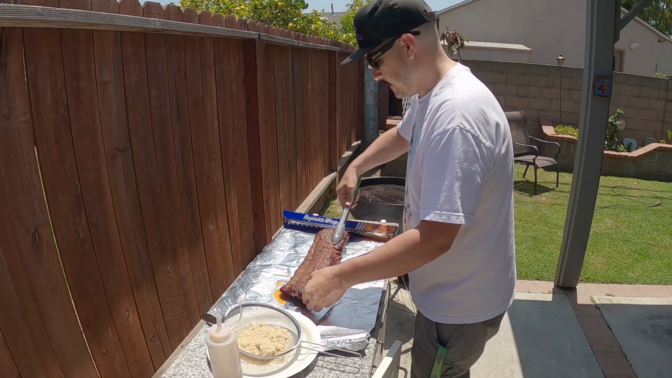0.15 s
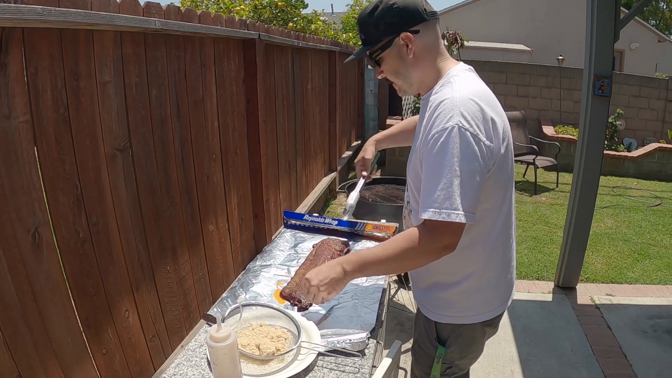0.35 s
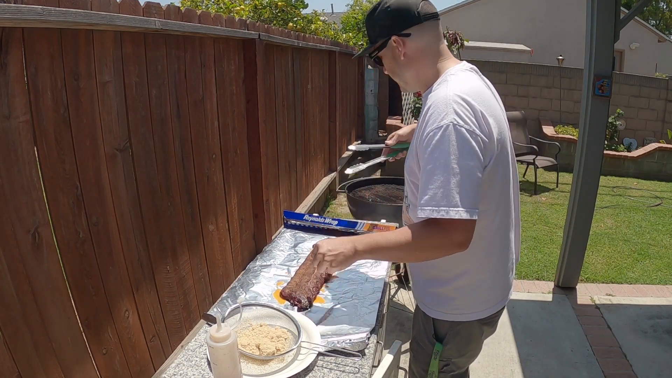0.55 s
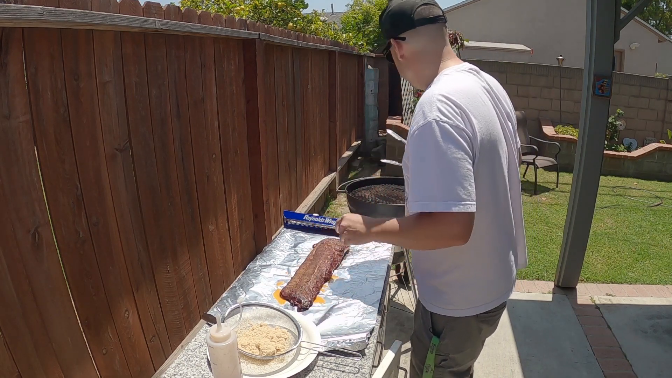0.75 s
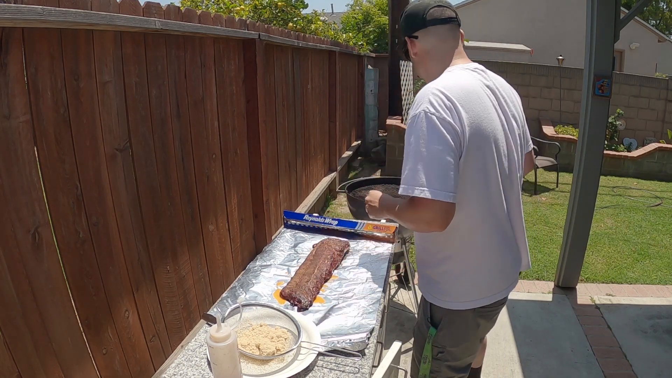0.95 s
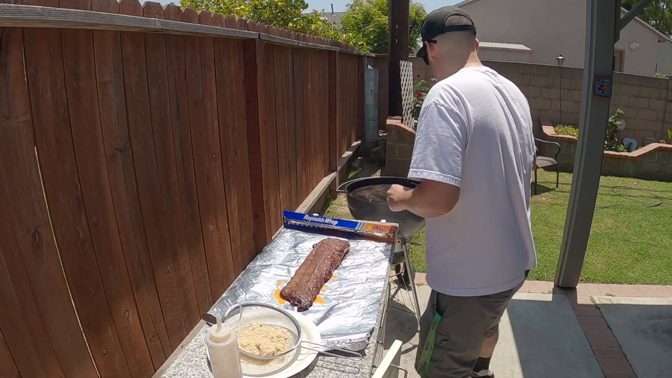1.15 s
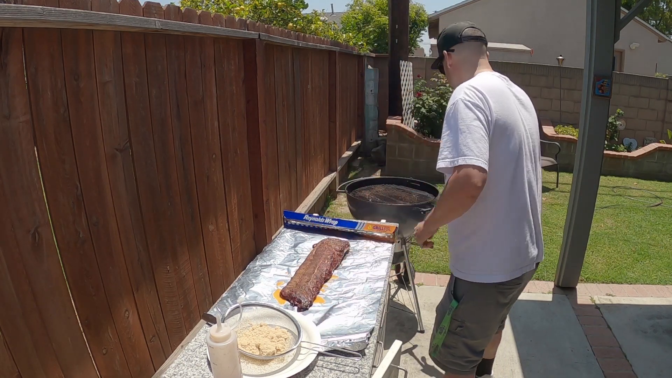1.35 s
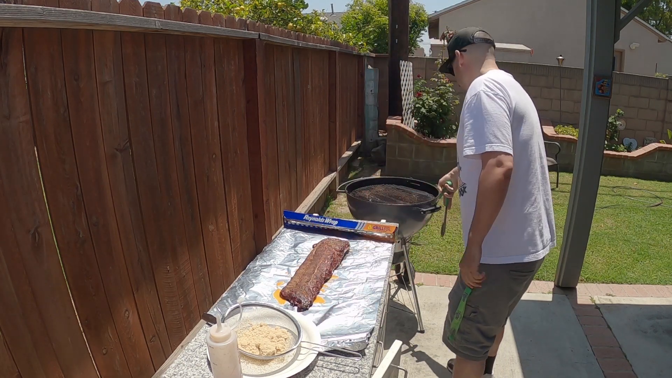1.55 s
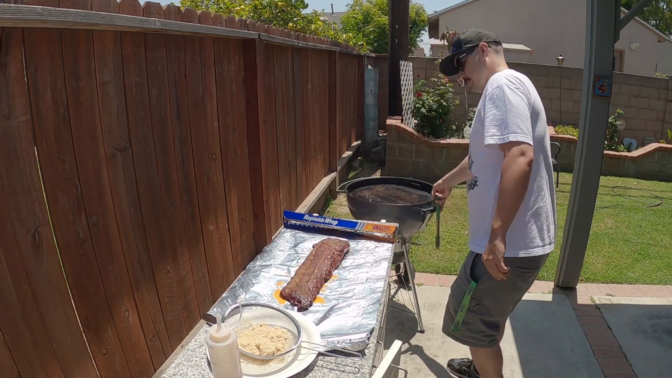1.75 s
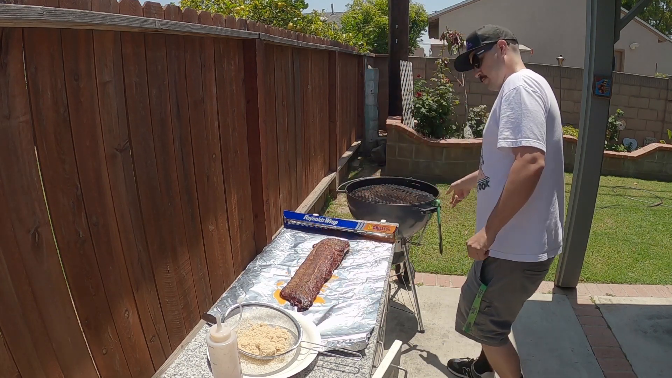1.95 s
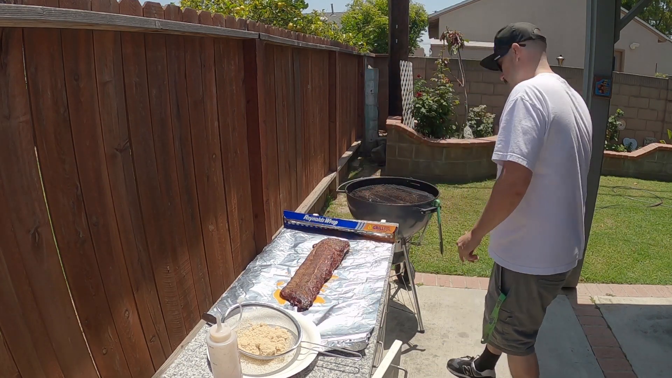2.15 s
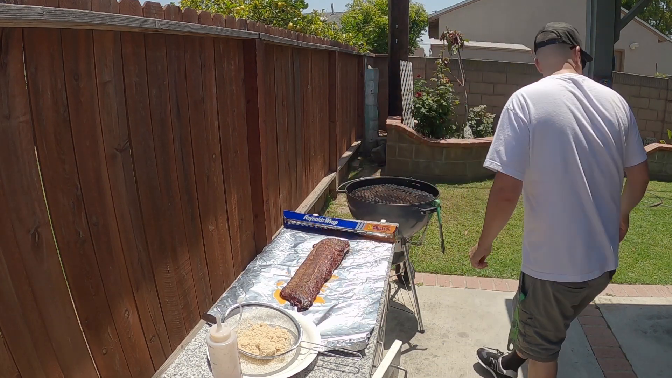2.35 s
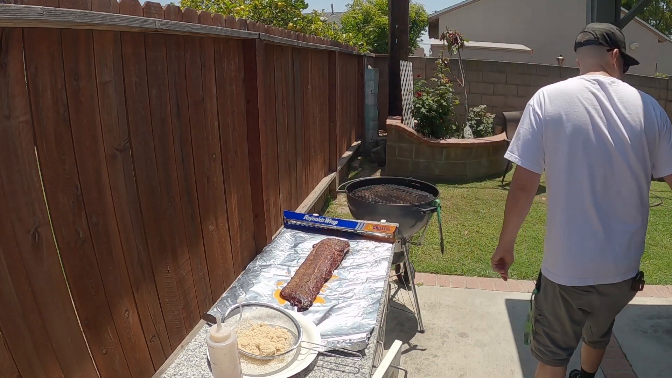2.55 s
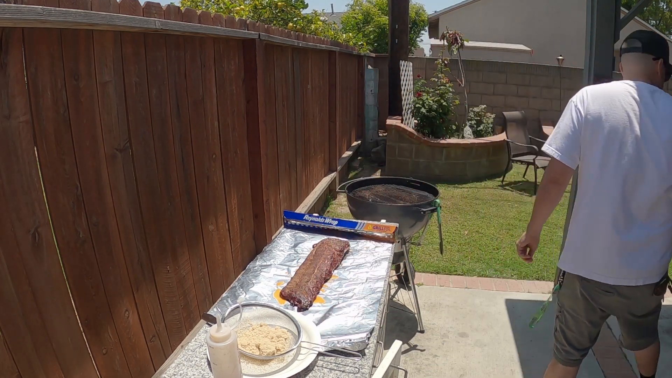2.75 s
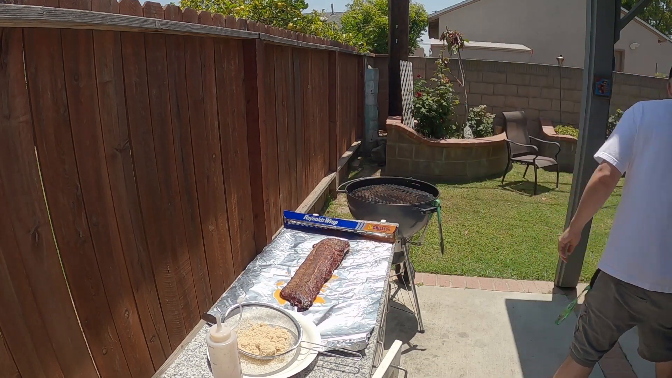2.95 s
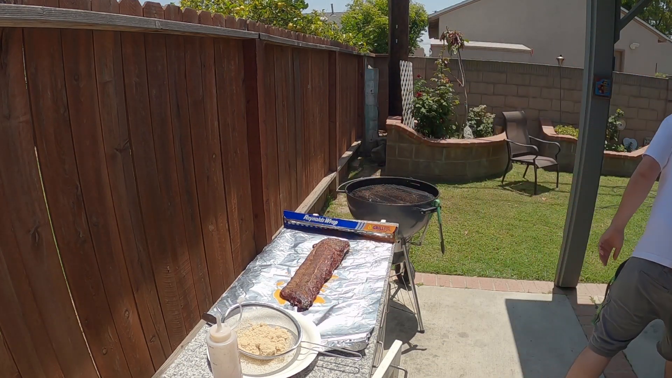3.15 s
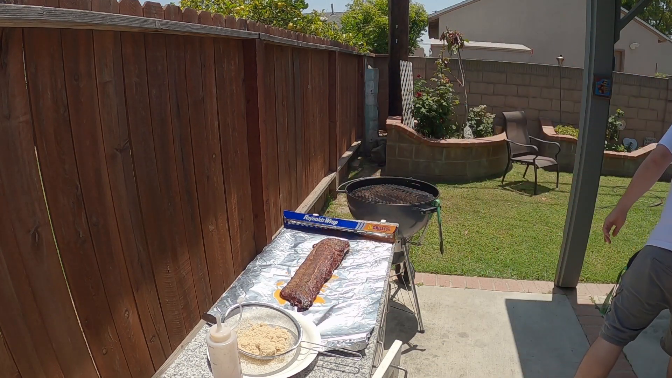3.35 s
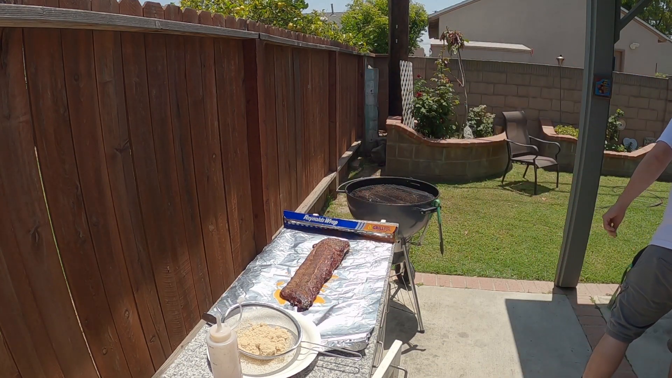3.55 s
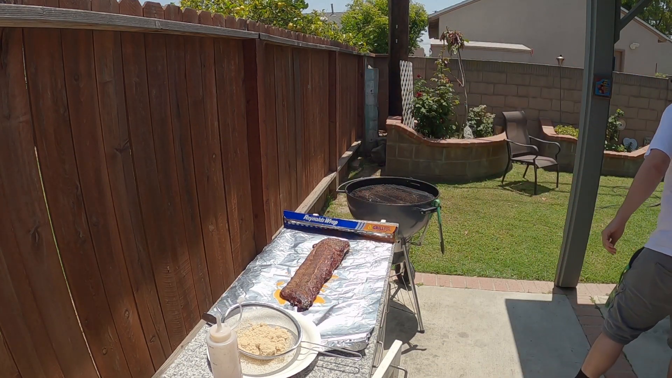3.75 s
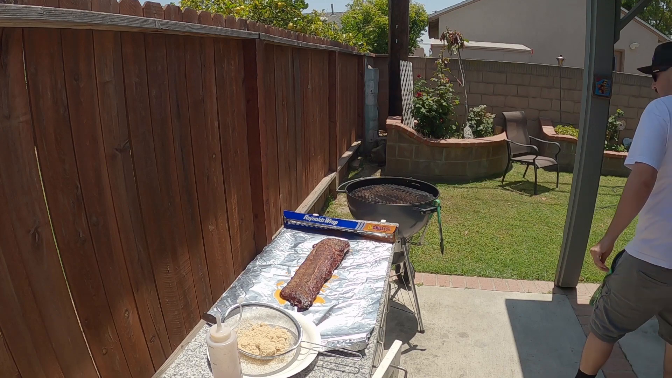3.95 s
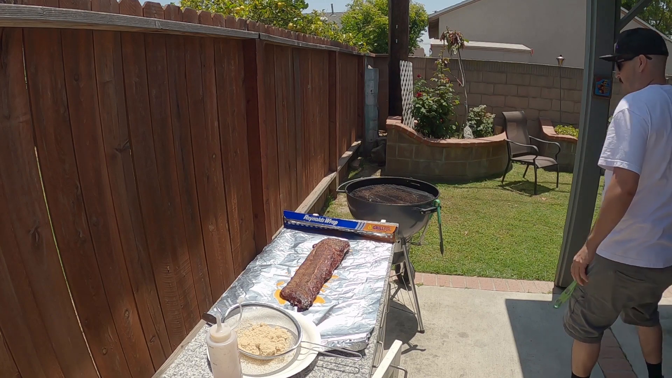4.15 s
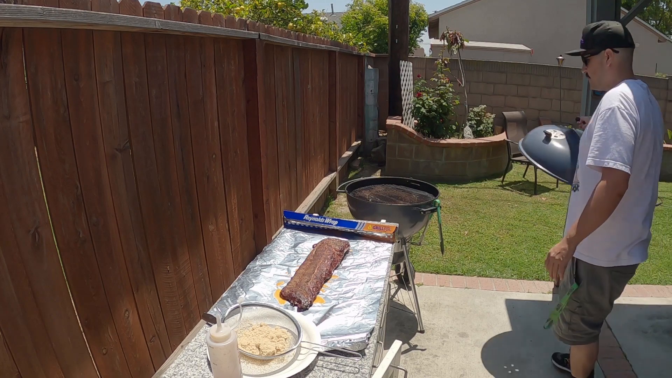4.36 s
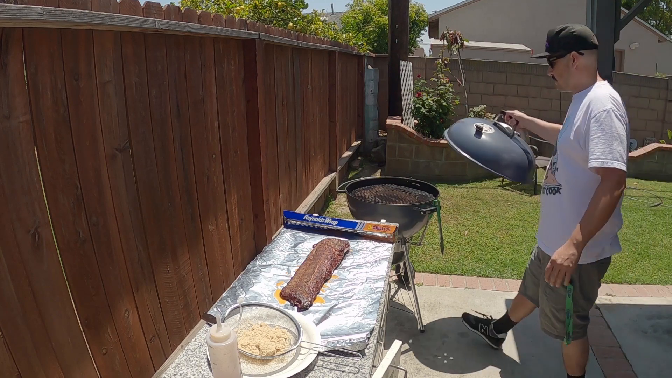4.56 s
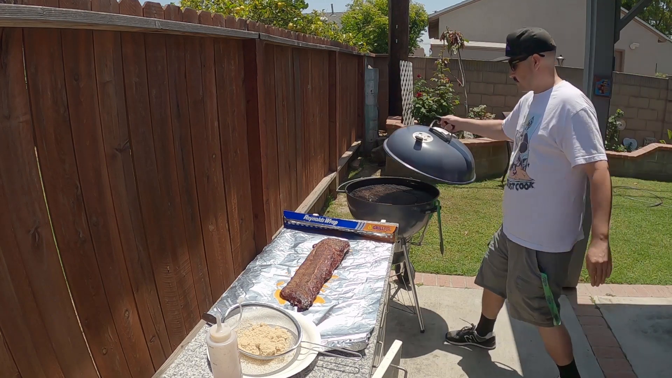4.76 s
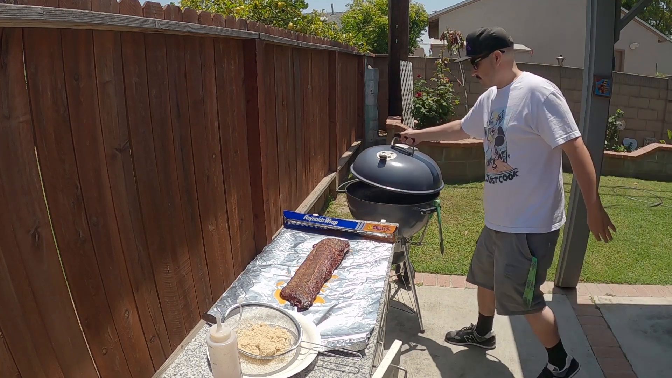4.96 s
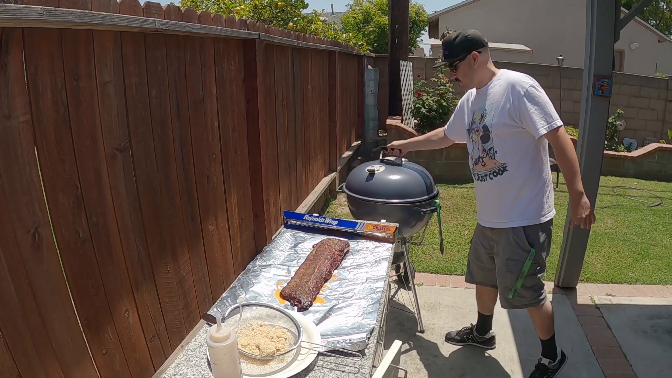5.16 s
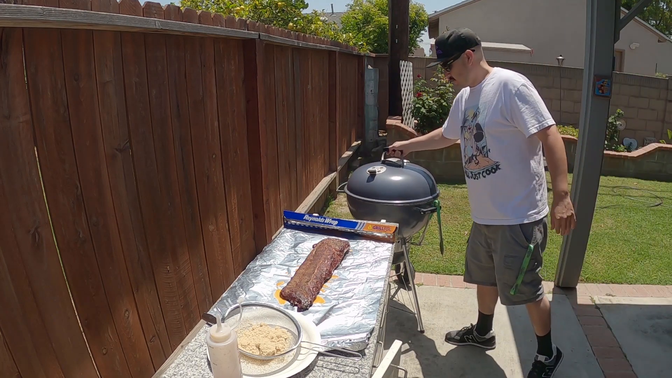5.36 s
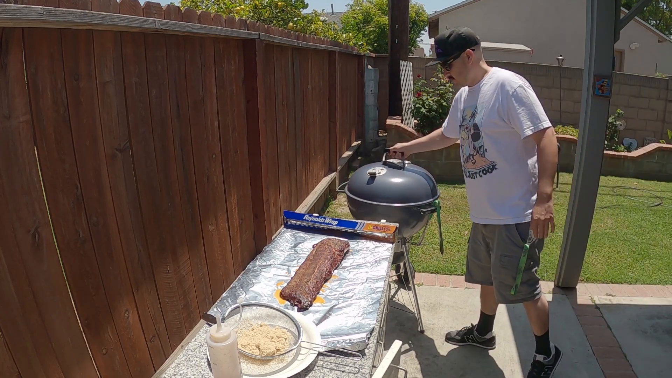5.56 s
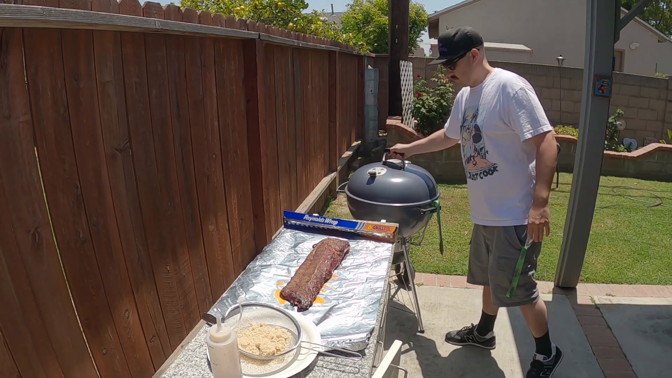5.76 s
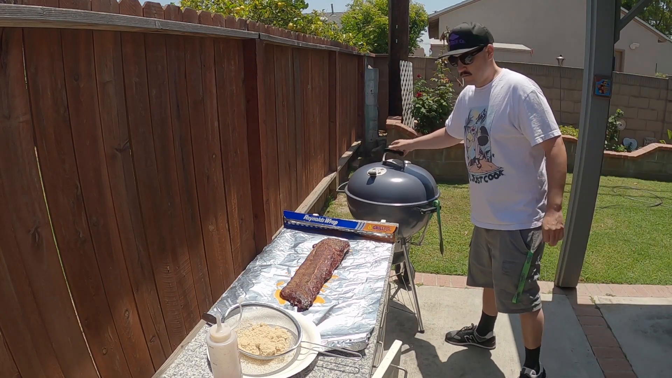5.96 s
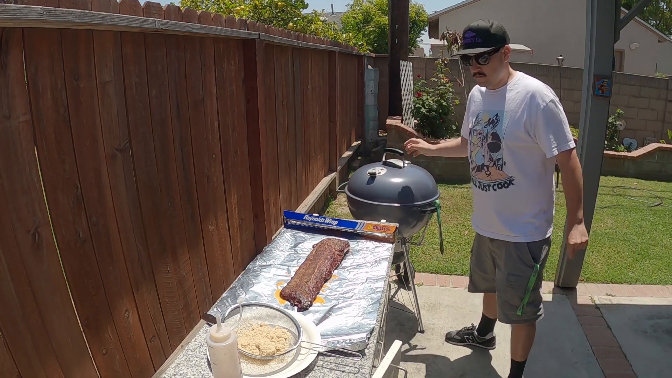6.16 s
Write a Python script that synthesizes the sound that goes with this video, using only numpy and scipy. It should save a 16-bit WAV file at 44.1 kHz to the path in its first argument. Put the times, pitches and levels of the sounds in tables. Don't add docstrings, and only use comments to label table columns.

```python
import sys
import numpy as np
from scipy import signal
from scipy.fft import rfft, irfft
from scipy.io import wavfile
from scipy.ndimage import uniform_filter1d

SR = 44100
rng = np.random.default_rng(int(sys.argv[2]) if len(sys.argv) > 2 else 0)


def invert_db(x):
    u = np.asarray(x, float) / 20
    return 10 ** u


def dump(signal):
    limited = np.clip(np.atleast_2d(signal).T, -1, 1)
    pcm = np.round(limited * 32767).astype(np.int16)
    wavfile.write(sys.argv[1], SR, pcm)


N = 273930

# frequency in Hz, density in dB per Hz.
YARD_COLOUR = [(12, -36.5), (20, -5.5), (44, -1.5), (129, -10), (157, -13), (196, -15.5), (252, -14.5),
               (315, -22), (597, -26), (667, -30.5), (1160, -28), (3350, -40), (7800, -54.5), (8400, -63),
               (12800, -76.5), (15500, -94)]
# frequency in Hz, width in Hz, level in dB.
DRONES = [(43, 1.3, -38), (87.5, 8.7, -44), (253.5, 4.314, -50.5), (608, 11.95, -57)]
# frequency in Hz, likeness from 0 to 1.
YARD_LIKENESS = [(60, 0.9954), (180, 0.9896), (550, 0.921), (1650, 0.67), (4970, 0.268), (15000, 0.36)]
# frequency in Hz, left over right in dB.
YARD_LEAN = [(60, 1.36), (240, 0.5), (950, -0.75), (3770, 2.5), (15000, -3)]

# frequency in Hz, density in dB per Hz.
FOIL_COLOUR = [(290, -42.5), (500, -16), (1140, -0.5), (1630, -14), (1830, -3), (2450, 0.5), (3830, 3.5),
               (6530, -6), (7760, -8.5), (11000, -22), (15700, -37)]
# time of the peak in seconds, peak in dB, brightness in dB, seconds to fall
# 20 dB.
PRESSES = [
    (0.0, -38, -16, 0.15),
    (0.198, -42.5, -9, 0.12),
    (0.278, -45, -11, 0.1),
    (0.324, -38, -7, 0.08),
    (0.42, -32.5, -13.5, 0.12),
    (0.486, -25.5, -8, 0.1154),
    (0.53, -20, -2, 0.0948),
]
# start in seconds, peak in dB, low share in dB (wide folds snap lower).
SNAPS = [(0.014, -26, -2), (0.061, -32, -16), (0.088, -30, -11), (0.138, -30, -9), (0.166, -28.5, -12),
         (0.187, -20.5, -11.5), (0.2147, -24, -13), (0.2776, -26, -31), (0.3087, -24.5, -3),
         (0.324, -24.5, -10), (0.3817, -34, 6), (0.394, -27.5, -20), (0.4242, -26, -9), (0.4387, -19.5, 11),
         (0.4566, -28, 4), (0.4714, -18.5, -1.5), (0.4819, -12, -15), (0.4956, -10.5, -7),
         (0.5048, -3.5, -9.5), (0.525, -13, -22), (0.5306, -7.5, -20), (0.545, -13, -17),
         (0.5513, -15.5, -18), (0.598, -26, -16.5), (0.633, -28, -12.5)]

# time of the peak in seconds, peak in dB, seconds to fall 20 dB.
SCUFFS = [
    (1.524, -47.5, 0.12),
    (3.3, -56.5, 1),
    (4.138, -53.5, 0.66),
    (4.945, -52.5, 0.6),
    (5.018, -49, 0.04),
    (5.64, -48.5, 0.4),
    (5.75, -37.5, 0.06),
]
# frequency in Hz, density in dB per Hz.
SCUFF_COLOUR = [(710, -56), (1200, -6), (1570, -5), (2590, -3.5), (3250, -2.5), (4570, -15.5), (5670, -14),
                (14000, -44.5)]
# start in seconds, peak in dB, frequency in Hz.
TICKS = [
    (3.0878, -30, 1700),
    (4.2695, -52, 7600),
]

# start in seconds, then crack peak, grate, arms and hinge levels in dB.
KNOCKS = [(1.5272, -34, -62, -49, -78), (1.6835, -13, -24, -50, -54), (1.7075, -23, -36, -53.5, -60.5),
          (1.7288, -36, -34.5, -53.5, -62.5), (1.7512, -25, -44, -59.5, -45),
          (1.7913, -16.5, -42, -36, -56), (1.797, -29, -47.5, -35, -58), (1.9265, -14.5, -46, -13.5, -48),
          (1.968, -36, -60, -28, -49), (1.9874, -11, -35, -23.5, -54), (2.008, -35, -55, -30, -51)]
# frequency in Hz, level in dB, seconds to fall 60 dB.
GRATE = [(1185, 7, 0.06), (1304, 6, 0.032), (1430, -11, 0.27), (1880, -5.5, 0.23), (3580, -8, 0.07),
         (4070, -9, 0.13), (5450, -12, .13), (7650, -16, 0.09), (10600, -19, .04)]
# frequency in Hz, level in dB, t60 in seconds.
GRIPPED_ARMS = [(2500, -6, 0.043), (2683, 0, 0.15), (2880, -6, 0.1), (3150, -4, 0.1)]
# frequency in Hz, level in dB, t60 in seconds.
FREE_ARMS = [(2670, -18, 0.146), (2860, -20, 0.088), (2975, -9, 0.11), (3040, -3, 0.15), (3093, -3, 0.12),
             (3190, 0, 0.09), (3280, -11, 0.07), (3460, -25, 0.06)]
# frequency in Hz, level in dB, t60 in seconds.
HINGE = [(3780, -2, 0.09), (4670, 2, 0.29), (5040, -14, .09)]
# frequency in Hz, level in dB, t60 in seconds.
TIPS = [(6860, -8, 0.17), (7750, -14, .04), (9600, -18, 0.04), (10900, -27, .12)]
# time of the peak in seconds, peak in dB, seconds to fall 20 dB.
SCRAPES = [
    (1.705, -41, 0.21),
    (1.8, -47, 0.2),
    (1.94, -39, 0.154),
    (1.995, -46.5, 0.23),
]
# frequency in Hz, density in dB per Hz.
SCRAPE_COLOUR = [(900, -30), (2200, -3), (3700, 1), (4600, -11), (5500, -7), (6500, -15.5), (10000, -23.5),
                 (15000, -40)]
# start in seconds, peak in dB.
JOLTS = [(1.684, -30.5), (1.734, -31), (1.795, -25), (1.814, -29.5), (1.977, -23.5), (2.011, -29.5),
         (2.03, -25.5), (2.041, -24), (2.05, -27.5), (2.064, -27), (2.089, -26.5), (2.109, -33)]
# frequency in Hz, level in dB, t60 in seconds.
KETTLE = [(426, -4.5, 0.093), (506, -9, 0.127), (545, -1, 0.13), (595, -0.5, 0.083), (664, -0.5, 0.1),
          (715, 1.5, 0.103), (781, 3.5, 0.118), (936, -1.5, 0.08)]
# frequency in Hz, level in dB, t60 in seconds.
LEGS = [(148, -10, 0.137), (189.5, -2, 0.21), (244, 0.5, 0.13), (335.7, -13, 0.088)]
LET_GO = 1.9

# start in seconds, then blow peak, shell, steel and thud levels in dB.
TOUCH = [
    (5.3019, -12, -28, -29, -20),
    (5.3035, -1, -19, -14.5, 1),
    (5.3143, -9.5, -17.5, -18.5, -13),
    (5.3335, -8.5, -24, -18.5, -18),
]
# start in seconds, then blow peak, shell, steel and thud levels in dB.
DROP = [
    (5.3605, -2, -14.5, -21, 1.5),
    (5.375, -9, -13.5, -16.5, -10),
    (5.3939, -12, -14, -22.5, -14),
    (5.4127, -12, -19, -18, -13),
]
# start in seconds, then blow peak, shell, steel and thud levels in dB.
SETTLE = [
    (5.4467, -5.5, -22.5, -20.5, -14),
    (5.4581, -7, -18, -22.5, -11.5),
    (5.4667, -6, -16, -20.5, -10.5),
    (5.4897, -14, -20, -23, -28),
]
# start in seconds, then blow peak, shell, steel and thud levels in dB.
REST = [
    (5.5226, -24, -26, -30.5, -36),
    (5.551, -31.5, -32.5, -36, -40),
    (5.574, -38, -32, -41, -46),
    (5.615, -40, -38, -49, -50),
]
# start in seconds, then blow peak, shell, steel and thud levels in dB.
NUDGE = [
    (5.6546, -40, -30.5, -47, -48),
    (5.7222, -27.5, -34, -44, -33),
    (5.7515, -32, -32, -46, -32),
]
# frequency in Hz, level in dB.
SHELL_STAGES = [
    [(141, -2.5), (365, -4), (474, 0)],
    [(85, -14), (141, -10), (280, -10.5), (366, -10), (463, -15), (620, -16.5), (790, -18)],
    [(85, -14.5), (140, -2), (264, -6.5), (330, 1), (463, -4.5), (592, -13), (810, -18)],
    [(140, -5), (330, -3.5), (450, -5.5)],
    [(178, -4), (340, 2.5), (400, -3), (460, -3)],
]
# frequency in Hz, level in dB.
LID_STEEL = [(931.3, -37.5), (1820, -27.5), (2196, -33), (2444, -21), (2665, -34.5), (2998, -27.5),
             (3149, -25), (3402, -32), (3623, -34.5), (3860, -31), (4097, -31.5), (4990, -31), (5426, -30),
             (5658, -35), (6094, -38), (6385, -44), (6831, -42)]
# frequency in Hz, level in dB.
BOWL_STEEL = [(753.7, -39), (958.2, -41), (1244, -45), (1464, -32.5), (1814, -33), (1938, -23),
              (2196, -32.5), (2460, -28.5), (2708, -30), (2939, -27), (3050, -30), (3171, -29.5),
              (3397, -36.5), (3634, -43), (3854, -32), (5216, -43.5), (6078, -53)]
# frequency in Hz, level in dB.
BAR_STEEL = [(812.9, -44), (947, -45.5), (1098, -47), (1251, -35), (1338, -36), (1610, -34.5), (1663, -37),
             (1949, -36), (2132, -48), (2207, -48.5), (2455, -43.5), (2719, -48), (2955, -30.5),
             (3052, -42), (3176, -35), (3408, -39), (3634, -39), (3957, -47), (5496, -42), (5722, -51)]
# frequency in Hz, level in dB.
SEATED_STEEL = [(1098, -11), (1254, 0), (1335, -1), (1642, -1), (1852, -5), (1935, -11), (2170, -10),
                (2440, -7), (2708, -15), (2955, -3), (3165, -5), (3650, -11), (3844, -18)]
# frequency in Hz, seconds to fall 60 dB.
STEEL_T60 = [(100, 0.53), (200, 0.17), (400, 0.064), (1000, 0.34), (1700, 0.31), (3000, 0.18), (4000, 0.21),
             (5500, 0.075), (7000, 0.127)]
# frequency in Hz, level in dB, t60 in seconds.
THUD = [(132.5, -12, 0.029), (199, 1, 0.055), (287.4, 5, 0.034), (336, 4.5, 0.0325), (473.7, 2, 0.039),
        (550, -4.5, 0.033), (660, -10.5, 0.038), (955, -20, 0.059)]
# frequency in Hz, level in dB.
RATTLE = [(700, -13), (1500, -12.5), (2800, 3.5), (4500, -5), (5500, -7.5), (8000, -17.5), (12000, -27.5)]
# start in seconds, peak in dB, frequency in Hz, rise and hold in seconds.
BOOMS = [(5.3025, -9, 200, 0.003, 0.01), (5.311, -13, 480.2, 0.0037, 0.012),
         (5.331, -1, 181.4, 0.0077, .03), (5.3594, -6, 200, .002, 0.0067), (5.3706, -9, 272, .003, 0.011),
         (5.3722, -8, 152, .004, .012), (5.3934, -8, 175, .004, 0.014), (5.41, -2, 185.5, 0.0058, .013),
         (5.434, -14, 168, .004, 0.011), (5.45, -17, 170, .004, .012), (5.466, -6.5, 177, 0.0045, 0.015),
         (5.4936, -8, 171, .004, 0.023), (5.5215, -16.5, 168, 0.0053, 0.028)]
# time of the peak in seconds, peak in dB, brightness in dB, seconds to
# fall 20 dB.
SLIPS = [
    (5.303, -16, 0, 0.34),
    (5.336, -17, -5, 0.16),
    (5.364, -9.5, -4, 0.09),
    (5.41, -16, -10, 0.02),
    (5.448, -12, -7, 0.0544),
    (5.472, -8.5, -9, 0.075),
]
# frequency in Hz, density in dB per Hz.
GRIND_COLOUR = [(180, -15.5), (300, -6), (404, -7), (462, -6), (632, -15), (811, -10.5), (1040, -16.5),
                (1920, -11), (3100, -20.5), (6330, -31.5), (15700, -62)]

# frequency in Hz, seconds to fall 60 dB.
PATIO_T60 = [(200, 0.18), (2000, 0.42), (6000, 0.25), (14000, 0.067)]


def evened(x):
    return x / np.sqrt(np.mean(x ** 2) + 1e-20)


def read(points, hz):
    f, value = np.transpose(points)
    return np.interp(np.log(hz + 1), np.log(f + 1), value)


def add(mix, s, sound):
    part = mix[round(s * SR):][:len(sound)]
    part += sound[:len(part)]


def colour(x, points):
    hz = np.fft.rfftfreq(len(x), 1 / SR)
    return evened(irfft(rfft(x) * invert_db(read(points, hz)), len(x)))


def highpass(x, order, hz):
    return signal.sosfilt(signal.butter(order, hz, "high", fs=SR, output="sos"), x)


def yard():
    frames, hz = N // 1024 + 5, np.fft.rfftfreq(4096, 1 / SR)
    a, b, c, d, patches = rng.standard_normal((frames, 2049, 5)).T
    patches = evened(uniform_filter1d(uniform_filter1d(patches, 28, 0), 6, 1))
    power = invert_db(read(YARD_COLOUR, hz)) ** 2
    power *= invert_db(-29.5 - 1.5) ** 2 / power.sum()
    for f, width, db in DRONES:
        bump = np.exp(-.5 * ((hz - f) / width) ** 2)
        power += invert_db(db) ** 2 * bump / bump.sum()
    same = np.clip(read(YARD_LIKENESS, hz), -1, 1)[:, None]
    left = a + 1j * b
    right = same * left + np.sqrt(1 - same ** 2) * (c + 1j * d)
    right = right / invert_db(read(YARD_LEAN, hz))[:, None]
    z = np.array([left, right]) * np.sqrt(power)[:, None] * invert_db(0.56 * patches)
    sound = signal.istft(z, nperseg=4096, noverlap=3072)[1][:, :N]
    return np.sqrt(power.sum()) * evened(sound)


def strokes(rows, start, stop, rise, dulling_db=0):
    s, db, bright_db, length = np.transpose(rows)[:, :, None]
    t = np.arange(max(start, 0), stop, 1 / 500)
    late = (t - s) / length
    power = invert_db(db - 20 * np.maximum(late, -late / rise)) ** 2
    top = power * invert_db(bright_db - dulling_db * np.clip(late, 0, 2)) ** 2
    total = power.sum(0)
    return np.transpose([t, 10 * np.log10(total), 10 * np.log10(top.sum(0) / total)])


def rustle(rows, points, per_s, grain_db, hinge_hz):
    s, db, *bright = np.transpose(rows)
    t, u = np.arange(s[0], s[-1], 1 / SR), np.arange(256) / SR
    size = invert_db(grain_db * np.minimum(rng.exponential(1, len(t)), 3))
    size = size * (rng.random(len(t)) < per_s / SR)
    kind, grains = rng.integers(0, 16, len(t)), np.zeros(len(t))
    for k, hz in enumerate(np.geomspace(700, 14000, num=16)):
        shape = np.sin(2 * np.pi * hz * u) * np.exp(-u * hz / 2.5)
        shape = shape * hz / np.linalg.norm(shape) / np.sqrt(hz)
        grains += signal.oaconvolve(size * (kind == k), shape)[:len(t)]
    hiss = 1.3 * rng.standard_normal(len(t))
    x = colour(hiss + evened(grains), points)
    if bright:
        lift_db = np.interp(t, s, bright[0] - np.median(bright[0]))
        x = x + highpass(x, 2, hinge_hz) * (invert_db(lift_db) - 1)
    return s[0], x * invert_db(np.interp(t, s, db)) * signal.windows.tukey(len(t), .04)


def crack(points, t60, rise):
    t = np.arange(4096) / SR
    return colour(rng.standard_normal(4096), points) * invert_db(-60 * t / t60) * (1 - np.exp(-t / rise))


def foil():
    out = np.zeros(N)
    pressure = strokes(PRESSES, 0, .8, rise=0.33, dulling_db=18.5)
    add(out, *rustle(pressure, FOIL_COLOUR, per_s=2000, grain_db=3.6, hinge_hz=6860))
    for s, db, low_db in SNAPS:
        top_db = -29 - 0.41 * low_db
        points = [(500, low_db - 8.5), (1200, low_db + 9.0), (2300, low_db), (4000, -5.5),
                  (7500, -12.5), (10000, top_db), (15500, top_db - 23)]
        add(out, s, invert_db(db - 9.5) * crack(points, t60=0.054, rise=0.000522))
    return out


def rub(rows, points, rise, per_s, grain_db):
    sounds = []
    for s, db, length in rows:
        curve = strokes([(s, db, 0, length)], s - 2 * rise * length, s + 2 * length, rise)
        sounds.append(rustle(curve[:, :2], points, per_s, grain_db, None))
    return sounds


def ring(modes, spread_db, rise, held=1., choke=.1, size=SR // 4, flutter_db=0, phases=1):
    hz, db, t60 = np.transpose(modes)[:, :, None]
    t = np.arange(min(size, int((max(held, 0) + choke) * SR))) / SR
    chance = rng.random((2, len(modes), 1))
    level_db = db + spread_db * (2 * chance[0] - 1) - 60 * t / np.maximum(t60, .01)
    if flutter_db:
        flutter_s = .011
        knots = np.arange(26)[:, None]
        between = np.maximum(1 - abs(t / flutter_s - knots), 0)
        wander = rng.standard_normal((len(modes), len(knots))) @ between
        level_db += flutter_db * wander * np.tanh(t / flutter_s)
    waves = invert_db(level_db) * np.sin(2 * np.pi * (hz * t + phases * chance[1]))
    shape = (1 - np.exp(-t / rise)) * invert_db(-60 * np.maximum(t - held, 0) / choke)
    return waves.sum(0) / np.sqrt(np.sum(invert_db(db) ** 2)) * shape


def steps():
    out = np.zeros(N)
    for scuff in rub(SCUFFS, SCUFF_COLOUR, rise=0.55, per_s=1500, grain_db=4.5):
        add(out, *scuff)
    for s, db, hz in TICKS:
        modes = [(hz * .62, 0, .007), (hz, 0, .007), (hz * 1.22, 0, .006)]
        add(out, s, invert_db(db) * ring(modes, spread_db=1, rise=0.0004))
    return out


def swarm(points, t60, count):
    hz = np.exp(rng.uniform(np.log(points[0][0]), np.log(points[-1][0]), count))
    modes = np.transpose([hz, read(points, hz), t60 * (3000 / hz) ** 0.27])
    return ring(modes, spread_db=1.5, rise=0.0022, size=int(.55 * t60 * SR))


def tongs():
    out = np.zeros(N)
    crack_colour = [(600, -32), (3000, 3), (9000, -12), (15000, -28)]
    swarm_colour = [(1500, -7.5), (3500, 0), (6000, -4.5), (8000, -9), (13000, -30)]
    until = np.diff(np.append(np.transpose(KNOCKS)[0], 2.048))
    for (s, db, grate_db, arms_db, hinge_db), held in zip(KNOCKS, until):
        add(out, s, invert_db(db - 16) * crack(crack_colour, t60=0.02, rise=0.00045))
        add(out, s, invert_db(db - 11.5) * swarm(swarm_colour, t60=.075, count=90))
        arms = GRIPPED_ARMS if s < LET_GO else FREE_ARMS
        tips_db = max(hinge_db - 7, arms_db - 25)
        parts = (GRATE, grate_db), (arms, arms_db), (HINGE, hinge_db), (TIPS, tips_db)
        for part, part_db in parts:
            sound = ring(part, spread_db=1.5, rise=.0006, held=held, choke=.04, flutter_db=2, phases=.12)
            add(out, s, invert_db(part_db + 4) * sound)
    for scrape in rub(SCRAPES, SCRAPE_COLOUR, rise=.1, per_s=1500, grain_db=2.5):
        add(out, *scrape)
    for s, db in JOLTS:
        legs_db = -1.5 if s > LET_GO else -5.5
        add(out, s, invert_db(db - 1.0) * ring(KETTLE, spread_db=3.0, rise=0.004, flutter_db=3))
        add(out, s, invert_db(db + legs_db) * ring(LEGS, spread_db=3, rise=.005))
    return out


def lid():
    out = np.zeros(N)
    blow_colour = [(500, -13), (1200, -19), (2600, -13.0), (8000, -19.0), (15000, -24)]
    stages = zip((TOUCH, DROP, SETTLE, REST, NUDGE), SHELL_STAGES,
                 (LID_STEEL, BOWL_STEEL, BAR_STEEL, SEATED_STEEL, SEATED_STEEL),
                 (5.36, 5.44, 5.53, 5.64, 5.79))
    for blows, shell, steel, end in stages:
        twins = [(hz * 1.011, db - 1.5) for hz, db in steel]
        for s, db, shell_db, steel_db, thud_db in blows:
            add(out, s, invert_db(db - 37.0) * crack(blow_colour, t60=0.022, rise=0.00087))
            add(out, s, invert_db(db - 11.0) * swarm(RATTLE, t60=0.16, count=120))
            thud = ring(THUD, spread_db=2.5, rise=0.00091, size=SR // 16, phases=0.29)
            add(out, s, invert_db(thud_db) * thud)
            for part, part_db, rise in ((shell, shell_db, .003), (list(steel) + twins, steel_db, .0008)):
                modes = [(hz, mode_db, read(STEEL_T60, hz)) for hz, mode_db in part]
                sound = ring(modes, spread_db=1.5, rise=rise, held=end - s, choke=0.23,
                             size=SR // 7, flutter_db=2.5, phases=.35)
                add(out, s, invert_db(part_db + 4.0) * sound)
    for s, db, hz, rise, held in BOOMS:
        boom = ring([(hz, 0, .3)], spread_db=1.5, rise=rise, held=held, choke=0.038, phases=0)
        add(out, s, invert_db(db) * boom)
    slipping = strokes(SLIPS, 5.3, 5.7, rise=0.13, dulling_db=8.5)
    s, grind = rustle(slipping, GRIND_COLOUR, per_s=2700, grain_db=1.5, hinge_hz=4000)
    add(out, s, invert_db(-10.0) * grind)
    return out


def patio(x):
    taps = np.zeros((2, SR // 2))
    at = np.arange(200, SR // 2 - 20, 20) + rng.integers(0, 20, (2, (SR // 2 - 201) // 20))
    np.put_along_axis(taps, at, rng.choice([-1., 1.], at.shape), 1)
    hz, t, z = signal.stft(taps, SR, nperseg=256)
    z = z * invert_db(-60 * t / read(PATIO_T60, hz)[:, None])
    tail = signal.istft(z, SR, nperseg=256)[1]
    return signal.fftconvolve(x[None], tail / np.linalg.norm(tail[0]), axes=1)[:, :N]


def placed(x, pan_db, wet_db, near_db):
    echoes = patio(x)
    near = rng.standard_normal(700) * invert_db(-24 * np.arange(700) / 700)
    scatter = signal.oaconvolve(x, near / np.linalg.norm(near))[:N]
    differ = invert_db(wet_db) * (echoes[0] - echoes[1]) / 2 + invert_db(near_db) * scatter
    apart = highpass(differ, 1, 1500)
    apart += invert_db(3) * highpass(differ, 2, 7000)
    direct = x * invert_db(np.array([[pan_db / 2], [-pan_db / 2]]))
    return direct + invert_db(wet_db) * echoes.mean(0) + np.array([apart, -apart])


def scene():
    out = yard()
    out = out + placed(foil(), pan_db=-0.3, wet_db=-13.0, near_db=-6.5)
    out = out + placed(steps() + tongs(), pan_db=0.42, wet_db=-14.5, near_db=-6.5)
    return out + placed(lid(), pan_db=1.0, wet_db=-11.0, near_db=-7)


def top_cut(x):
    return signal.sosfilt(signal.butter(12, 15890, fs=SR, output="sos"), x)


def record(dry):
    hz = np.fft.rfftfreq(N, 1 / SR)
    band = invert_db(read([(10, -25), (25, -6), (38, 0), (15700, 0), (15900, -70)], hz))
    lag = .8 * np.tanh(hz / 3400)
    dry = irfft(rfft(dry) * band * np.exp(-1j * np.array([lag, 0 * lag])), N)
    power_db = 10 * np.log10(abs(uniform_filter1d((dry ** 2).mean(0), 800)) + 1e-12)
    fall = np.arange(N) * 9.1 / SR
    held_db = np.maximum.accumulate(power_db + fall) - fall
    over_db = np.maximum(held_db + 23.0, 0)
    ducked = dry / invert_db(0.15 * uniform_filter1d(over_db, 300))
    return top_cut(np.clip(ducked, -1, 1))


dry = scene()
out = record(dry)
dump(out)
```